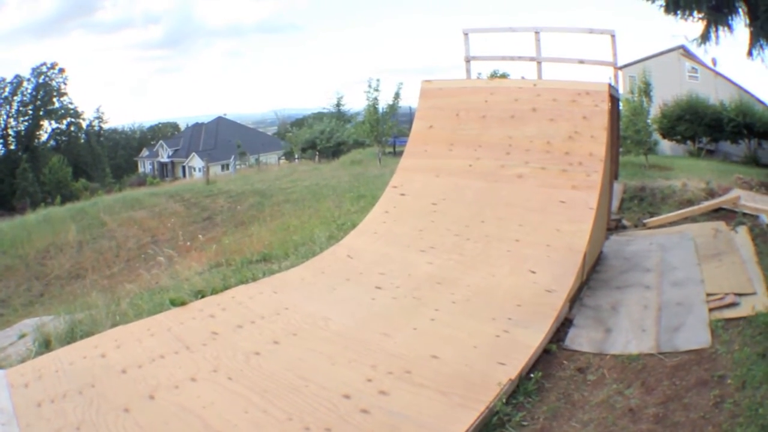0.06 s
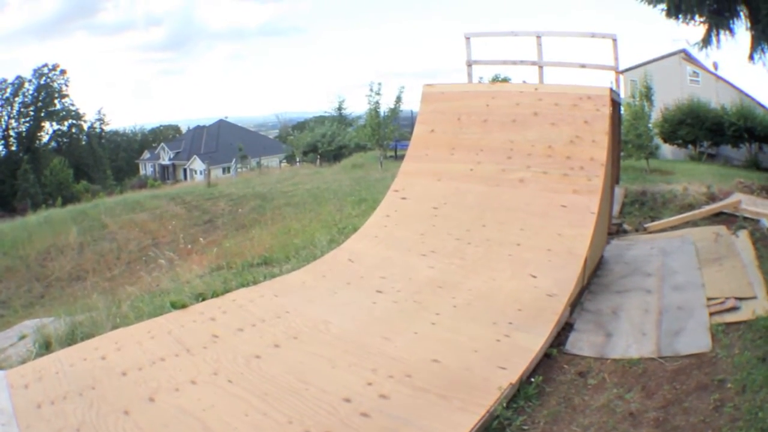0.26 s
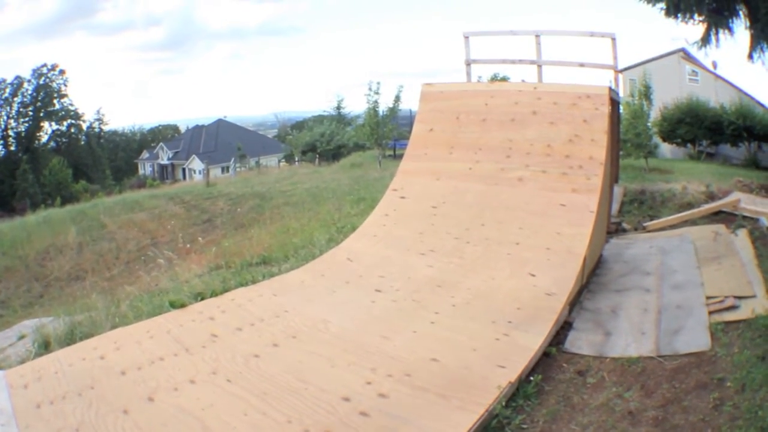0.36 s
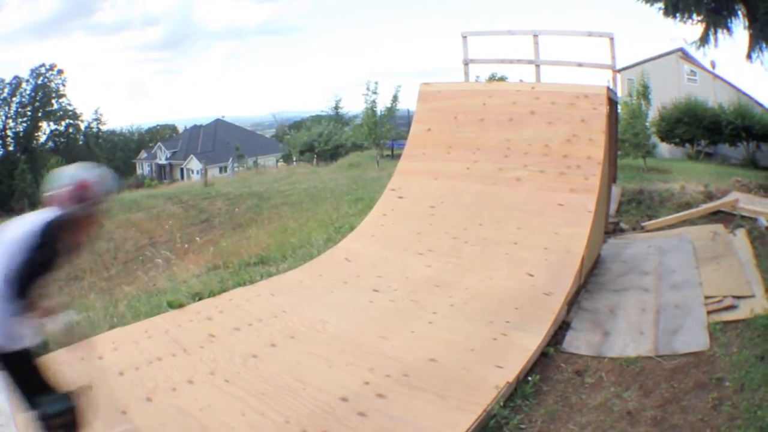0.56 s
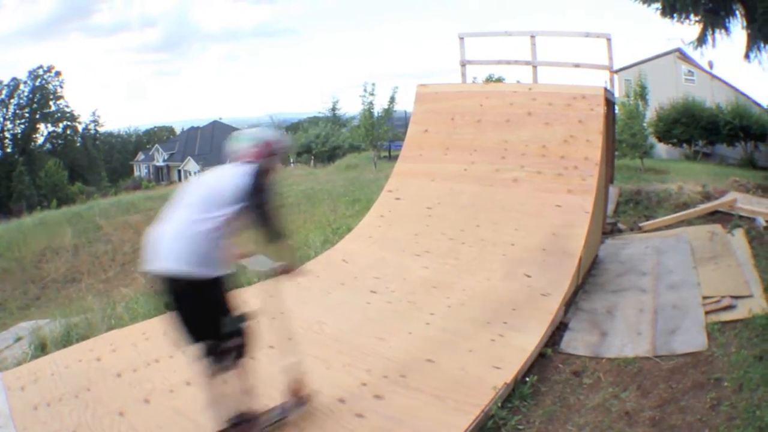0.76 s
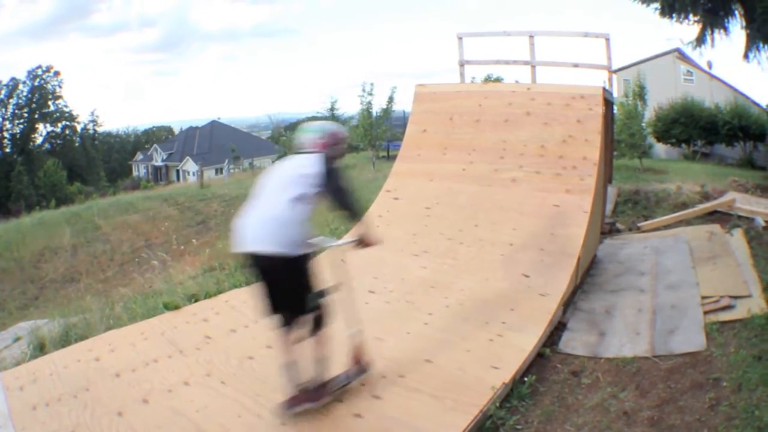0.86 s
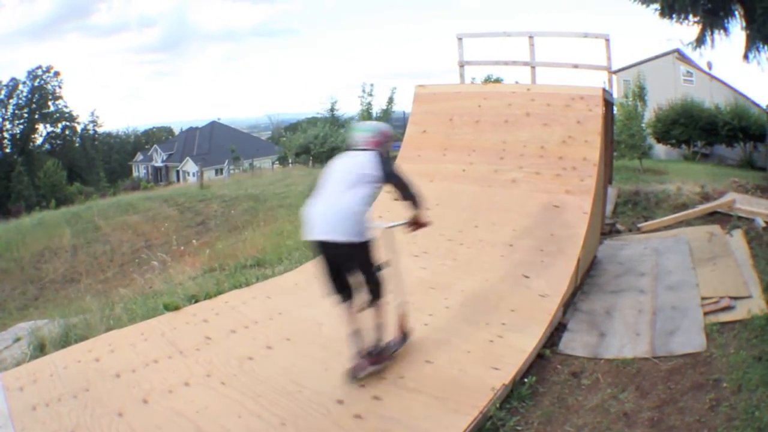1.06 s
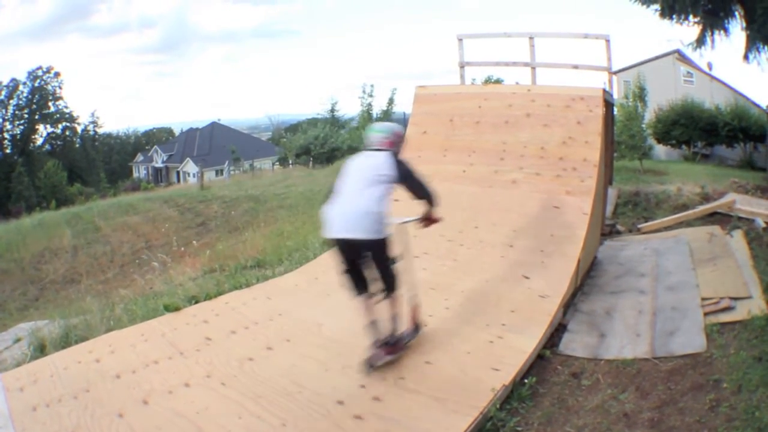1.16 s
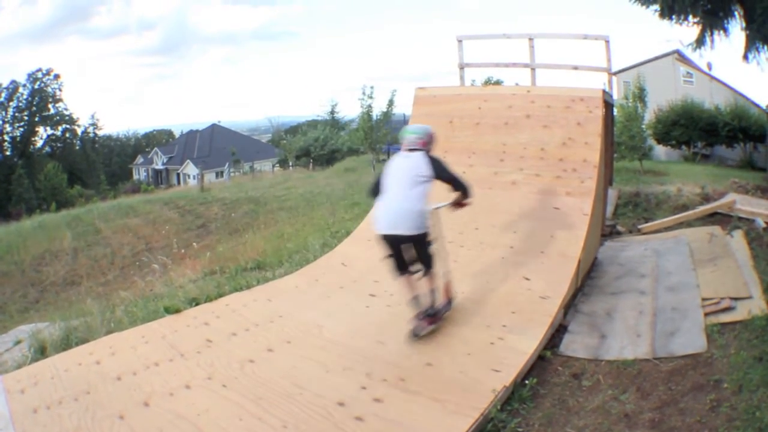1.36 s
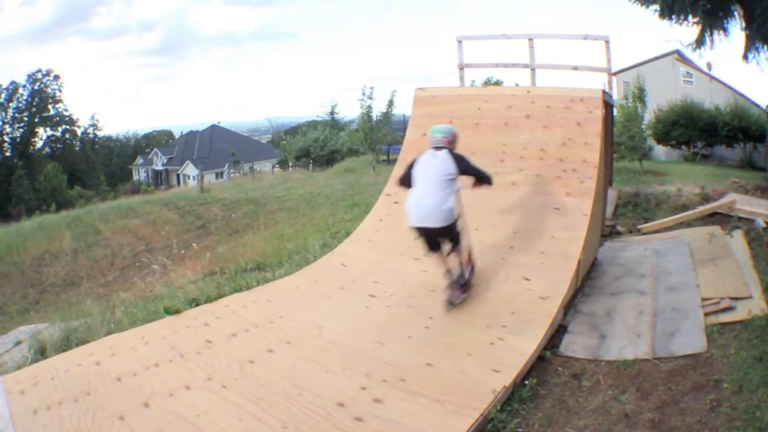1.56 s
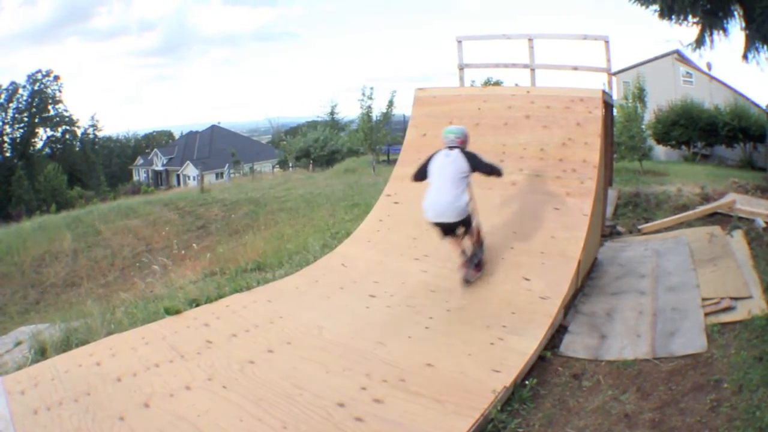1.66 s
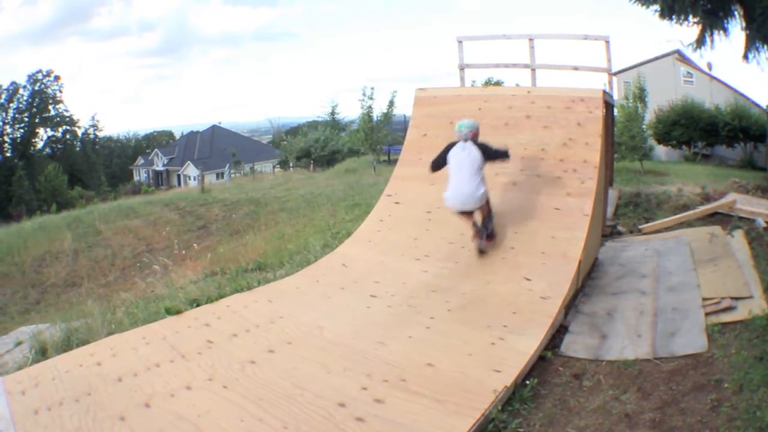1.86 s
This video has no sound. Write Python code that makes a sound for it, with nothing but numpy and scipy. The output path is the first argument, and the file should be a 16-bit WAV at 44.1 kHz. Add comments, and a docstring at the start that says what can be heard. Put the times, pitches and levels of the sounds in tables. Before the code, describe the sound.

Scooter knocks and scuffs up close, followed by duller wheels rolling over hollow plywood.

```python
"""A scooter on a wooden ramp

Close, dry knocks, clicks and scuffing sound over a steady hiss as a scooter sets off.
Then the sound turns abruptly duller and farther off: small wheels roar and hum on plywood,
and the hollow ramp thumps twice as they cross the joints between its sheets."""
import sys
import numpy as np
from scipy import signal
from scipy.fft import rfft, irfft, next_fast_len
from scipy.io import wavfile
from scipy.ndimage import map_coordinates

SR = 44100
rng = np.random.default_rng(int(sys.argv[2]) if len(sys.argv) > 2 else 0)


def log_audio(samples):
    """Write samples as a 16-bit WAV file to the path given in sys.argv[1]."""
    # one column per channel
    frames = np.atleast_2d(samples).T
    # limit to full scale, then quantise
    limited = np.clip(frames, -1, 1)
    pcm = np.round(limited * 32767).astype(np.int16)
    wavfile.write(sys.argv[1], SR, pcm)


N = 83790


def amp(db):
    """Turn decibels into a gain to multiply by."""
    return 10 ** (np.asarray(db) / 20)


def unit(x):
    """Scale a sound to an average strength (rms) of 1."""
    return x / np.sqrt(np.mean(x ** 2) + 1e-20)


def since(start):
    """Seconds since a moment, zero before it."""
    return np.maximum(np.arange(N) / SR - start, 0)


def fall(t, fade_s):
    """A fade that drops 60 dB in the fade time."""
    return np.exp(-np.log(1000) * t / fade_s)


def curves(rows):
    """Join timed points with straight lines, one curve for each column after the time."""
    times, *columns = np.transpose(rows)
    return [np.interp(since(0), times, column) for column in columns]


def wobble(rate):
    """A smooth curve through `rate` random values a second."""
    return map_coordinates(rng.standard_normal(1024), [since(0) * rate], mode="wrap")


def filtered(x, gain_at):
    """Turn each frequency of a sound up or down by gain_at(hz)."""
    size = next_fast_len(N + 8192)
    return irfft(rfft(x, size) * gain_at(np.fft.rfftfreq(size, 1 / SR)), size)[:N]


def cut_bass(x, edge_hz):
    """Take away the bass below an edge."""
    return signal.sosfilt(signal.butter(4, edge_hz, "high", fs=SR, output="sos"), x)


def coloured(x, spectrum):
    """Shape a sound by (frequency [Hz], level [dB]) points, at strength 1."""
    points_hz, db = np.transpose(spectrum)
    return unit(filtered(x, lambda hz: amp(np.interp(np.log(hz + 1), np.log(points_hz), db))))


def noise(spectrum):
    """Noise with the given spectrum, at strength 1."""
    return coloured(rng.standard_normal(N), spectrum)


def ring(start, tones, pitch=1, scatter_db=1.5):
    """A struck object rings with fading tones, each of slightly random strength."""
    t, out = since(start), np.zeros(N)
    live = (t > 0) & (t < .25)
    for k, (hz, db, fade_s) in enumerate(tones):
        strength = (-1) ** k * amp(db + scatter_db * rng.standard_normal())
        out[live] += strength * np.sin(2 * np.pi * hz * pitch * t[live]) * fall(t[live], fade_s)
    return out


def hiss():
    """A soft, steady background hiss."""
    # tone colour of the hiss (frequency [Hz], level [dB])
    spectrum = [(25, -24.5), (70, -9.5), (140, -10.5), (350, -2.5), (1000, -1.5), (2000, -4.5), (3400, -4),
                (5500, -9), (10000, -16.5), (16000, -26.5)]
    return amp(-42) * noise(spectrum)


def scuffing(grains_per_s=500):
    """Uneven low rubbing under a gritty rasp of tiny grains."""
    # how loud the scuffing is (time [s], rubbing level [dB], relative grit level [dB])
    levels = [(.22, -61, -62), (.255, -38, -36), (.33, -41, -42.5), (.39, -36, -27), (.45, -33.5, -33),
              (.495, -35.5, -31.5), (.55, -28, -31.5), (.59, -37, -35.5), (.66, -38.5, -37),
              (.75, -47.5, -38.5), (.89, -45.5, -35)]
    # tone colours of the rubbing and the grit (frequency [Hz], level [dB])
    rub_spectrum = [(30, -17), (60, -22.5), (90, 2), (250, 5.5), (450, 3.5), (700, -3), (1300, -9),
                    (2500, -56), (8000, -59)]
    grit_spectrum = [(100, -16), (600, -6.5), (1600, 2.5), (2200, -3.5), (3200, 2), (5000, -8),
                     (6800, -6.5), (10000, -10.5), (16000, -21.5)]
    rub_db, grit_db = curves(levels)
    grains = (rng.random(N) < grains_per_s / SR) * rng.standard_normal(N)
    rasp = noise(grit_spectrum) + amp(-4.5) * coloured(grains, grit_spectrum)
    rub = amp(rub_db + 1.55 * wobble(90)) * noise(rub_spectrum)
    return rub + amp(grit_db - 1.2 + 2.4 * wobble(79.5)) * rasp


def wheel_hum(roughness=0.76, wobbles_per_s=110):
    """The wheels sing in short, slightly rough swells, some sliding in pitch."""
    # swells (peak time [s], pitch [Hz], level [dB], half length [s], slide [Hz/s])
    swells = [(.92, 500, -38.5, 0.014, 0), (1.05, 537, -42.5, 0.053, 1100.5),
              (1.17, 514.6, -42.5, 0.045, -800), (1.34, 487, -45.5, 0.024, -4),
              (1.582, 450, -36.5, 0.014, 2), (1.858, 404, -41, 0.022, 702.5)]
    out = np.zeros(N)
    for peak, hz, db, half_length, slide in swells:
        t = since(0) - peak
        phase = 2 * np.pi * (hz + slide * t / 2) * t + roughness * wobble(wobbles_per_s)
        flutter = 1 + roughness * wobble(wobbles_per_s)
        out += amp(db) * np.exp(-(t / half_length) ** 2) * unit(np.sin(phase) * flutter)
    return out


def rolling():
    """The wheels roar and hum on the plywood, and the hollow under the ramp drones."""
    # how loud the wheels and the hollow are (time [s], level [dB])
    roar_levels = [(.9, -35.5), (1.05, -37), (1.28, -38), (1.45, -38), (1.62, -36.5), (1.9, -39)]
    drone_levels = [(.9, -50.5), (.96, -43.5), (1.02, -55.5), (1.33, -50), (1.46, -39.5), (1.58, -45.5),
                    (1.63, -40.5), (1.71, -37.5), (1.78, -47.5), (1.83, -39), (1.9, -50)]
    # tone colours of the wheels and the hollow (frequency [Hz], level [dB])
    roar_spectrum = [(25, -23.5), (60, -12.5), (200, -3.5), (320, -2), (500, 2.5), (700, -1.5), (900, 0.5),
                     (1150, -3), (1500, 0), (2600, -5.5), (4000, -11.5), (6000, -20), (9000, -31),
                     (10700, -42.5)]
    drone_spectrum = [(20, -27), (50, -1.5), (85, 3.5), (140, 0.5), (190, 0), (260, -21), (600, -61)]
    (roar_db,), (drone_db,) = curves(roar_levels), curves(drone_levels)
    wheels = amp(roar_db + 0.38 * wobble(39.8)) * noise(roar_spectrum) + wheel_hum()
    drone = amp(drone_db + 1.84 * wobble(25.37)) * noise(drone_spectrum)
    return wheels + drone


def joint_thumps(thump_rise_s=0.0092, clatter_rise_s=0.0096):
    """As a wheel crosses a joint, the plywood sheet booms and the scooter clatters."""
    # crossings (time [s], relative thump level [dB], relative clatter level [dB], pitch [ratio])
    crossings = [(1.422, -15.5, -30.5, 0.95), (1.452, -24, -49, 0.76), (1.611, -29.5, -43.5, 0.92),
                 (1.631, -17, -30.5, 1.07)]
    # tones of the sheet (frequency [Hz], level [dB], fade time [s])
    plywood_tones = [(91.7, -13, 0.095), (121, 4, 0.068), (142, -9, 0.052)]
    # tone colour of the clatter (frequency [Hz], level [dB])
    clatter_spectrum = [(100, -16.5), (450, 3.5), (1200, 0.5), (2400, 6.5), (4000, -5.5), (8000, -26.5),
                        (10500, -50), (11600, -73.5)]
    out = np.zeros(N)
    for start, thump_db, clatter_db, pitch in crossings:
        t = since(start)
        thump = (1 - np.exp(-t / thump_rise_s)) * ring(start, plywood_tones, pitch)
        clatter = (1 - np.exp(-t / clatter_rise_s)) * fall(t, fade_s=0.14) * noise(clatter_spectrum)
        out += amp(thump_db + 2) * thump + amp(clatter_db + 7) * clatter
    return out


def hard_parts():
    """A small part snaps, the deck cracks under the hardest knocks, and metal clinks on metal."""
    # tones of the small part, the deck and the metal (frequency [Hz], level [dB], fade time [s])
    snap_tones = [(2800, -2, 0.015), (3780, -3, 0.0076), (4730, -4.5, 0.011), (5260, -10, .009),
                  (7460, -27, 0.0093)]
    deck_tones = [(1002, -2.5, 0.0077), (1390, -2.5, 0.0028), (2050, -3.5, 0.0061)]
    metal_tones = [(8700, 0.5, 0.0089), (9200, -9, 0.01), (7450, -14.5, .012), (6870, -19.5, 0.012),
                   (10150, -10, 0.0072)]
    # hits on the deck (time [s], level [dB])
    cracks = [(.2337, -17.5), (0.3573, -11.5), (.506, -3.5)]
    # hits on metal (time [s], level [dB], pitch [ratio])
    clinks = [(.5069, -3, 1), (0.5098, -14.5, 0.86), (0.6083, -13, 0.88), (0.609, -24, 0.73),
              (0.6185, -20, .82), (1.639, -26.5, 0.72)]
    out = amp(-12) * ring(start=.8191, tones=snap_tones)
    for start, db in cracks:
        out += amp(db) * ring(start, deck_tones)
    for start, db, pitch in clinks:
        out += amp(db) * ring(start, metal_tones, pitch)
    return out


def clicks():
    """Hard parts click, each with a tiny burst of noise around one frequency."""
    # sharp clicks (time [s], level [dB], centre [Hz], width [octaves], fade time [s])
    bursts = [(0.147, -26.5, 1680, 0.66, 0.025), (0.2377, -25, 8900, .8, 0.019),
              (0.251, -20.5, 3460, 0.52, 0.019), (.277, -29.5, 7000, 0.52, 0.015),
              (0.286, -25.5, 4540, 0.65, 0.032), (0.317, -31.5, 10000, .8, 0.018),
              (0.3426, -25, 8000, 1.6, .015), (0.3777, -22, 5500, 1.9, 0.026),
              (0.3854, -20, 8400, 0.57, 0.011), (0.3896, -21, 6360, 0.22, 0.01),
              (.462, -23, 13460, .3, 0.0091), (0.504, -20, 6560, 0.28, 0.0096),
              (0.5063, -8, 7000, 1.1, 0.0059), (0.5055, -26, 11500, 0.67, .014),
              (.511, -19, 8000, 0.8, .014), (.554, -25, 3570, 0.33, 0.039), (0.565, -24, 4900, 0.58, 0.02),
              (0.6056, -20, 4260, 0.97, 0.038), (0.6165, -19, 3260, 0.47, 0.026),
              (.634, -25.5, 4000, 0.5, 0.024), (0.679, -27.5, 5100, 0.38, 0.016),
              (.733, -30.5, 13000, .3, 0.0085), (.8192, -20.5, 4200, 0.34, .012),
              (0.933, -31, 1770, 0.13, 0.045), (1.039, -36, 4900, 0.17, 0.032),
              (1.6351, -40.5, 7550, 0.23, 0.019), (1.641, -32, 3930, 0.3, 0.03),
              (1.662, -39, 6940, 0.19, .014), (1.875, -38, 3140, 0.36, 0.096)]
    out = np.zeros(N)
    for start, db, centre_hz, octaves, fade_s in bursts:
        band = lambda hz: 1 / (1 + (np.log2((hz + 1) / centre_hz) / octaves) ** 2)
        band_strength = np.sqrt(np.mean(band(np.arange(SR // 2)) ** 2))
        t = since(start)
        burst = (t > 0) * fall(t, fade_s) * rng.standard_normal(N)
        out += amp(db) / band_strength * filtered(burst, band)
    return out


def knocks(contacts=4, thump_rise_s=0.0014, thump_fade_s=0.043):
    """Each knock thumps the board and bounces on the hollow body while loose parts rattle."""
    # knocks (time [s], relative bounce level [dB], bounce gap [s], loss per bounce [dB],
    # rattle level [dB], rattle length [s], thump pitch of the spot hit [Hz], thump level [dB])
    hits = [(0.2341, -18.5, .0042, 0.5, -25, 0.014, 228, -14.5),
            (0.3584, -11, 0.0046, 5.5, -25.5, 0.023, 232, -11.5),
            (0.418, -26, 0.0085, 6, -32.5, 0.0066, 158, -17), (.45, -31, .006, 7, -54.5, 0.0088, 247, -20),
            (0.506, -14, .0046, 3.5, -23, 0.02, 201.7, -17),
            (.5168, -16.5, .0047, 0.5, -28, .012, 455, -18.5),
            (0.53, -22, .0043, 3.5, -43, 0.008, 238, -16.5),
            (0.6052, -16.5, 0.0028, 4, -30, 0.0098, 329, -13.5)]
    # tones of the hollow body (frequency [Hz], level [dB], fade time [s])
    body_tones = [(340, -6.5, 0.054), (489, -6, 0.051), (716, -17, .03), (924, 0, 0.017), (1086, -20, .03),
                  (1380, 1.5, 0.02), (1620, -8, 0.0293), (1860, -3.5, 0.0165)]
    # tone colour of the loose parts (frequency [Hz], level [dB])
    rattle_spectrum = [(50, -17), (130, -14.5), (350, 0), (650, -5), (1400, 0), (2100, -13.5),
                       (4500, -16.5), (9000, -22.5), (16000, -42)]
    out, chatter = np.zeros(N), np.zeros(N)
    for start, db, gap, loss_db, rattle_db, rattle_s, thump_hz, thump_db in hits:
        t = since(start)
        out += (1 - np.exp(-t / thump_rise_s)) * ring(start, [(thump_hz, thump_db, thump_fade_s)])
        for k in range(contacts):
            stray = min(k, 1) * rng.uniform(-0.232, .2)  # only the first contact is exactly on time
            pitch = 1 + 0.043 * rng.standard_normal()
            chatter += amp(db - loss_db * k - 6.5) * ring(start + gap * (k + stray), body_tones, pitch)
        burst = fall(np.maximum(t - rattle_s, 0), fade_s=0.028)  # holds, then dies quickly
        tail = amp(-8) * fall(t, fade_s=0.16)
        out += amp(rattle_db + 3.1 * wobble(350)) * (t > 0) * (burst + tail) * noise(rattle_spectrum)
    return out + cut_bass(chatter, edge_hz=280)


def scene(change_s=.895, fade_s=.003, dull_hz=10700):
    """Close, bright sounds and hiss first, then the ramp, duller and farther off."""
    ticks = hard_parts() + clicks()
    close = cut_bass(knocks() + ticks + scuffing(), edge_hz=74)
    ramp = rolling() + joint_thumps() + ticks
    far = filtered(ramp, lambda hz: 1 / (1 + (hz / dull_hz) ** 80))
    fade_out = 1 - np.clip(since(change_s - fade_s) / fade_s, 0, 1)
    fade_in = np.clip(since(change_s) / fade_s, 0, 1)
    return (fade_out * (close + hiss()) + fade_in * far)[None]


def record(dry, top_hz=15900):
    """Cut away the very highest treble."""
    return np.array([filtered(x, lambda hz: 1 / (1 + (hz / top_hz) ** 200)) for x in dry])


dry = scene()
out = record(dry)
log_audio(out)
```